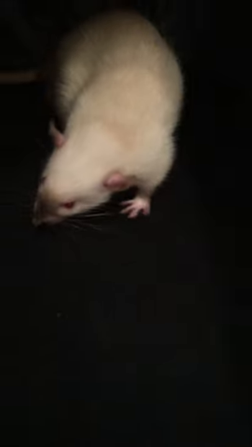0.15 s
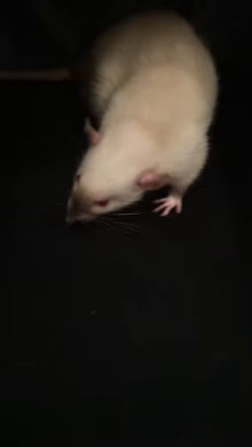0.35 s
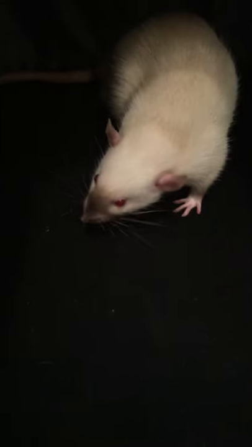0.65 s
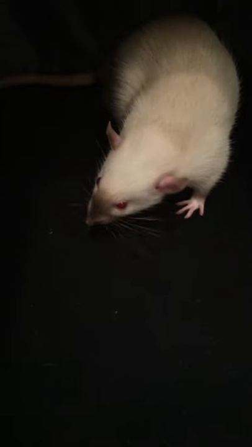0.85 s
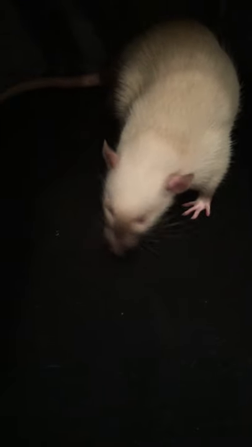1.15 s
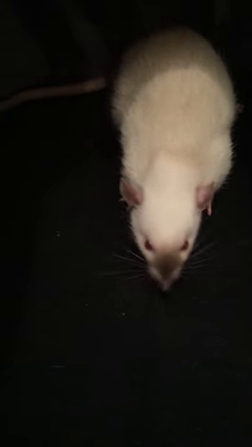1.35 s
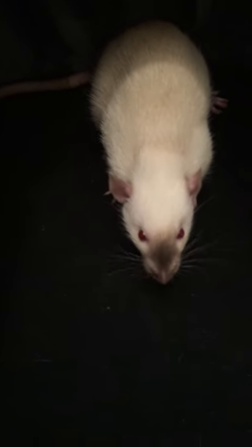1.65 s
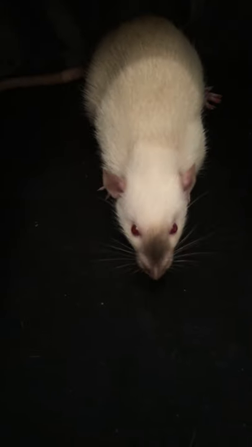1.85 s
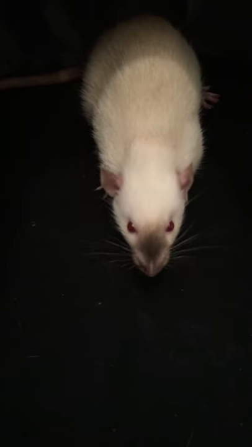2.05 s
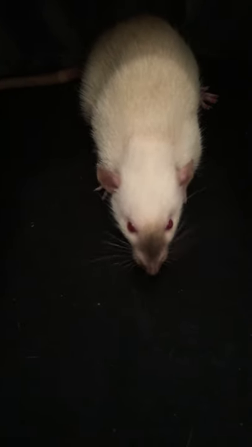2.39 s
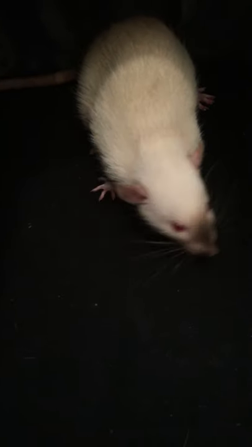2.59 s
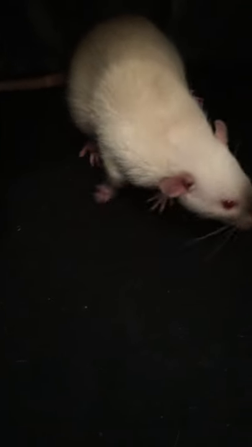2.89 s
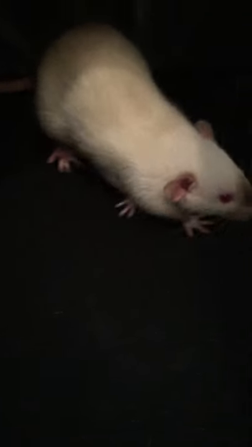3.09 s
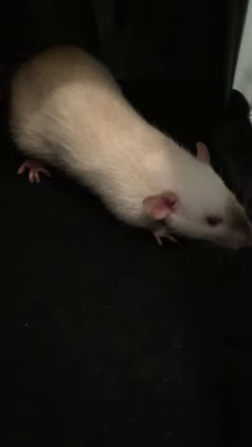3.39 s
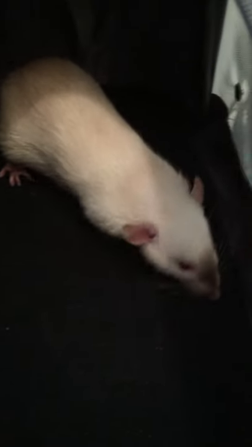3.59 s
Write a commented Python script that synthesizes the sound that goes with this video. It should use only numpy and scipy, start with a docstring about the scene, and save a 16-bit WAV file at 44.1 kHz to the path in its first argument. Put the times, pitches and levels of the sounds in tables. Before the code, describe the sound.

Rat clucking in quick uneven knocking bursts, with soft thumps and faint hum beneath

```python
"""A quiet room: a pet rat chatters close to a microphone while it shifts about on a cloth.
Each cluck is a short, uneven run of throat pulses: a bright knock, a hollow ring under it and a noisy rasp.
Steps are soft low thumps; claws and fur are brief band-limited strokes of grainy noise.
Hum of wavering sines, low rumble and microphone hiss lie beneath."""
import sys
import numpy as np
from scipy import signal
from scipy.fft import rfft, irfft
from scipy.io import wavfile

SR = 44100
rng = np.random.default_rng(int(sys.argv[2]) if len(sys.argv) > 2 else 0)


def to_wav(sig):
    """Store sig (one row per channel, or 1-D mono) as 16-bit WAV at the path in sys.argv[1].

    Samples outside -1..1 are clipped; the rate is SR.
    """
    pcm = np.clip(np.atleast_2d(sig), -1, 1) * 32767
    pcm = np.round(pcm).astype(np.int16)
    wavfile.write(sys.argv[1], SR, pcm.T)  # frames by channels


N = 164493

# Room hum: (frequency [Hz], rms level [dB])
HUM = [(54.5, -59), (61, -68), (86, -62.5), (120, -63.5)]
HUM_WAVER_RAD = 0.3  # rms phase wander
# Noise colours, room rumble and microphone hiss: (frequency [Hz], relative density [dB per Hz])
RUMBLE_SPECTRUM = [(15, -48), (35, -20.5), (52, -3.5), (70, 0.5), (100, 0), (130, -4), (165, -15.5),
                   (205, -17.5), (260, -19), (340, -31.5), (450, -29.5), (620, -39), (780, -44),
                   (1200, -42), (1500, -40), (4000, -69)]
HISS_SPECTRUM = [(100, 8.5), (1000, 4.5), (2200, 2.5), (3400, 1), (4400, 0.5), (4900, -4), (5400, -1.5),
                 (6500, -2), (7600, -5.5), (8700, -4), (9700, -5), (10400, -10), (11200, -6.5),
                 (15500, -10)]
RUMBLE_DB, HISS_DB = -57.5, -74.5  # rms

# Soft footfalls: (time [s], peak level [dB], frequency [Hz], rise [s])
FOOTFALLS = [(0.032, -37.5, 48.4, 0.033), (.115, -45, 132, .014), (0.596, -34, 52.3, 0.022),
             (0.724, -40.5, 61, 0.017), (1.164, -41, 51, 0.024), (1.258, -41.5, 59.7, 0.022),
             (1.747, -41, 100, 0.0098), (2.922, -53, 53.6, 0.0087)]

# Claws and fur on the cloth: (time [s], length [s], level [dB], centre [Hz])
BRUSHES = [(0.049, 0.53, -82, 4500), (0.41, 0.063, -74, 3130), (1.337, .025, -70, 3440),
           (1.42, 0.047, -76.5, 4400), (1.516, 0.064, -74.5, 3660), (1.697, 0.0057, -71, 7060),
           (1.715, .02, -78, 8660), (2.047, .008, -77, 7840), (2.515, 0.0046, -71, 5000),
           (2.76, 0.03, -80, 8500), (2.846, 0.24, -79.5, 3650), (3.133, 0.028, -70, 3260),
           (3.212, 0.066, -72.5, 3550), (3.24, 0.014, -69.5, 8200), (3.308, 0.44, -82.5, 3000),
           (2.801, 0.89, -84.5, 8900), (3.583, 0.073, -79.5, 7970)]
BRUSH_WIDTH_OCTAVES, BRUSH_GRAIN_DB = 0.38, 5  # standard deviations of band and grain level

# Clucks: (time [s], length [s], pulses [count], level [dB], strongest pulse's place [0-1],
#          hollow ring re level [dB], nominal knock pitch [Hz])
CLUCKS = [ (0.0168, .0312, 5, -44.5, 0.69, 1.5, 1390), (0.0746, .0236, 4, -40.5, 0.87, -0.5, 1380),
          (.1652, .027, 4, -48.5, 0.56, 5, 1360), (0.2094, .0066, 2, -49, 0.64, 7.5, 1300),
          (0.2489, .0064, 2, -41, 0.03, -6, 1640), (0.3483, .0088, 2, -40.5, 0.55, -0.5, 1420),
          (0.383, 0.0071, 2, -48, 0.05, 2.5, 1360), (0.419, .029, 4, -43.5, 0.82, 2, 1380),
          (0.4626, .007, 2, -45.5, 0, -2, 1420), (0.51, .0343, 5, -44.5, 0.13, 1.5, 1280),
          (0.5815, .0047, 2, -44, 0.4, 2.5, 1330), (0.6594, .0069, 2, -42.5, 0.3, 1.5, 1520),
          (0.685, .0244, 4, -43, 0.72, 0, 1320), (0.7387, .0073, 2, -48, 0.02, -4, 1280),
          (.817, .0353, 4, -57.5, 0.7, 12, 1280), (.8706, .006, 2, -45.5, 0.45, 3, 1250),
          (0.9073, .0044, 2, -41.5, 0.3, -2.5, 1300), (1.1201, .0343, 5, -47.5, .7, 1.5, 1330),
          (1.191, .0113, 3, -35, 0.88, -5, 1415), (1.2572, .0528, 5, -40, 0.93, -1, 1380),
          (1.3408, .0116, 3, -30.5, 0.81, -10, 1394), (1.4206, .0775, 10, -39.5, 0.73, -6, 1356),
          (1.5217, .0352, 5, -35, 0.36, -7.5, 1410), (1.6074, .008, 2, -42.5, 0.6, -2, 1300),
          (1.642, .0073, 2, -51, 0.9, -7, 1240), (1.6744, .0274, 5, -40.5, 0.36, -2, 1270),
          (1.859, .0334, 5, -36, 0.58, -4, 1250), (1.9895, .0214, 3, -49, 0.3, -5.5, 1320),
          (2.048, .0092, 2, -36, 0.27, -3.5, 1270), (2.0678, .0105, 3, -34, 0.81, -7.5, 1270),
          (2.1312, .0478, 6, -44, 0.47, -4, 1200), (2.2, .0312, 6, -37.5, 0.98, -2.5, 1270),
          (2.31, .02, 3, -53.5, 0.69, 3.5, 1210), (2.5205, .009, 2, -48.5, 0.19, 3, 1320),
          (2.551, .008, 2, -56, 0, 6, 1280), (2.5942, .0183, 4, -41, 0.52, -0.5, 1290),
          (2.6633, .0273, 4, -49.5, 0.3, -3.5, 1280), (2.7503, .0238, 5, -37.5, 0.58, -2, 1294),
          (2.838, .0227, 4, -52, 0.84, 4.5, 1240), (2.8839, .0086, 2, -46.5, 0.37, 3, 1230),
          (2.9377, .0306, 6, -39, .5, 0, 1304), (3.0258, .009, 2, -53.5, 0.43, 6, 1140),
          (3.06, .0213, 2, -51, .3, 0, 1230), (3.113, .0182, 4, -42, 0.8, 0.5, 1096),
          (3.183, .0091, 2, -50.5, 1, -1.5, 1120), (3.2536, .0123, 3, -39.5, 1, 0.5, 1335),
          (3.388, .012, 3, -54, 0.86, 9, 1090), (3.409, .005, 2, -43.5, 0, -3.5, 1510),
          (3.481, .0101, 2, -49, 0.64, 1.5, 1004), (3.5235, .0109, 2, -44.5, 0.45, 1.5, 1010),
          (3.6208, .0309, 2, -47, 0.51, 3.5, 1090)]
SWELL_DB, FADE_DB = 10, 8  # drop before and after the strongest pulse, per whole cluck length
ALTERNATE_DB = 2  # cut of every second pulse, counted from the strongest
SLOWING = 0.094  # pulses spread out towards the end of a cluck
JITTER_S, UNEVEN_DB, PITCH_SPREAD = 0.00046, 1.5, 0.079  # standard deviations; pitch as a ratio
BRIGHTER_PER_DB = 0.01  # stronger pulses in a cluck knock higher: pitch ratio per dB
LEAD_IN_S, LEAD_IN_DB = 0.007, -22  # faint knock before the cluck catches

# Bright knock of one pulse: (frequency [Hz], relative level [dB])
KNOCK_SPECTRUM = [(100, -34), (500, -19), (760, -13), (930, 2.5), (1200, 5), (1520, 6), (1800, -7),
                  (2020, -3.5), (2250, -23.5), (2800, -34.5), (3700, -39), (5000, -58.5), (16000, -70)]
KNOCK_HZ = 1330  # pitch that the spectrum stands for
KNOCK_SHARPNESS = 0.48  # 0 = even click, 1 = hard attack
KNOCK_DB = 1

# Hollow enclosure modes, before the band-pass: (frequency [Hz], level [dB], t60 [s])
RING_MODES = [(266, -16, 0.039), (340.3, -18.5, 0.073), (448.8, -9.5, 0.033), (516.5, -6.5, 0.033),
              (558, -18, 0.0067)]
RING_DB, RING_RISE_S = 7, 0.00041

# Rasp colour: (frequency [Hz], relative level [dB])
RASP_SPECTRUM = [(500, -34), (1600, -0.5), (2000, -3.5), (2250, -12), (2450, 7), (2800, 3), (3200, -1),
                 (3750, -4.5), (4300, -32), (8000, -13.5), (16000, -43)]
RASP_DB, RASP_DECAY_S = -33.5, 0.0084
RASP_GROWTH, RASP_EFFORT_DB = 0.22, -29  # extra rasp dB per pulse dB above this level

# Noise under each cluck: hollow flutter and airy haze in the knock's colour
FLUTTER_DB, HAZE_DB, FLUTTER_SPILL_S = -20, -29, 0.018  # spill widens both at each end

GAP_HZ, GAP_WIDTH_HZ = 746, 147  # dark gap between ring and knock; full width at 1/e
# Nearby walls: (delay [s], level [dB])
WALL_ECHOES = [(.0027, -21), (.0054, -22), (.0072, -19), (0.0113, -20)]
ROOM_DB, ROOM_T60_S = -16, 0.12
EDGE_HZ = 15720  # recorder low-pass


def amp(db):
    """Decibels to gain."""
    return 10 ** (np.asarray(db) / 20)


def unit(x):
    """Scales to rms 1."""
    return x / np.sqrt(np.mean(x ** 2) + 1e-30)


def read(points, hz):
    """Reads a spectrum in dB, interpolated on a log-frequency axis."""
    f, db = np.transpose(points)
    return np.interp(np.log(hz + 1), np.log(f + 1), db)


def add(mix, start_s, sound):
    """Mixes a sound in at a time."""
    part = mix[max(0, round(start_s * SR)):][:len(sound)]
    part += sound[:len(part)]


def noise(points):
    """Steady noise of a given colour, rms 1."""
    gain = amp(read(points, np.fft.rfftfreq(N, 1 / SR)))
    return unit(irfft(rfft(rng.standard_normal(N)) * gain, N))


def background():
    """Hum of sines with slowly wandering phase, plus steady rumble and hiss."""
    t = np.arange(N) / SR
    slow = [(0, 0), (2, 0), (8, -25), (30, -100)]  # wander spectrum (Hz, dB)
    hum = np.zeros(N)
    for hz, db in HUM:
        phase = 2 * np.pi * (hz * t + rng.random()) + HUM_WAVER_RAD * noise(slow)
        hum += amp(db) * np.sqrt(2) * np.sin(phase)
    return hum + amp(RUMBLE_DB) * noise(RUMBLE_SPECTRUM) + amp(HISS_DB) * noise(HISS_SPECTRUM)


def footfalls():
    """Each step sets the surface swinging for a few low cycles."""
    out, t = np.zeros(N), np.arange(SR // 3) / SR
    for start_s, db, hz, rise_s in FOOTFALLS:
        envelope = (t / rise_s * np.exp(1 - t / rise_s)) ** 2
        add(out, start_s, amp(db) * envelope * np.sin(2 * np.pi * hz * t))
    return out


def brushes():
    """Claws and fur on cloth: uneven noise grains in a narrow band, swelling and fading."""
    out, hz = np.zeros(N), np.fft.rfftfreq(SR, 1 / SR)
    for start_s, length_s, db, centre_hz in BRUSHES:
        grains = rng.standard_normal(SR) * amp(BRUSH_GRAIN_DB * rng.standard_normal(SR))
        octaves = np.log2((hz + 1) / centre_hz)
        band = np.exp(-0.5 * (octaves / BRUSH_WIDTH_OCTAVES) ** 2)
        stroke = unit(irfft(rfft(grains) * band, SR))
        shape = np.hanning(round(length_s * SR))
        add(out, start_s, amp(db) * shape * stroke[:len(shape)])
    return out


def knock(size=2048):
    """Bright throat click, peak 1; phase between zero and minimum sets the attack."""
    log_gain = np.log(amp(read(KNOCK_SPECTRUM, abs(np.fft.fftfreq(size, 1 / SR)))))
    phase = -KNOCK_SHARPNESS * signal.hilbert(log_gain).imag
    click = np.fft.ifft(np.exp(log_gain + 1j * phase)).real
    click = np.roll(click, size // 8)  # room for the part ahead of the attack
    return click / abs(click).max()


def hollow_ring(size=2048):
    """Low enclosure modes that each pulse sets ringing: decaying sines with a soft onset."""
    t = np.arange(size) / SR
    ring = np.zeros(size)
    for hz, db, t60_s in RING_MODES:
        ring += amp(db - 60 * t / t60_s) * np.sin(2 * np.pi * hz * t)
    ring *= 1 - np.exp(-t / RING_RISE_S)
    band = signal.butter(2, [160, 660], "bandpass", fs=SR, output="sos")
    return signal.sosfilt(band, ring)


def chatter():
    """Runs of throat pulses that swell, slow a little and stop; each knocks, rings and rasps."""
    out, bright, hollow = np.zeros(N), knock(), hollow_ring()
    rasp_level, under_level = np.zeros(N), np.zeros(N)
    t = np.arange(len(bright)) / SR
    lead_s = np.argmax(abs(signal.hilbert(bright))) / SR  # knock's peak within its buffer
    for start_s, length_s, pulses, level_db, peak, ring_db, pitch_hz in CLUCKS:
        spill = np.hanning(round((length_s + 2 * FLUTTER_SPILL_S) * SR))
        add(under_level, start_s - FLUTTER_SPILL_S, amp(level_db + ring_db) * spill)
        chance = rng.standard_normal((pulses, 4))
        for u, (late, loud, high, low) in zip(np.linspace(0, 1, pulses), chance):
            middle = 4 * u * (1 - u)  # no jitter on first and last pulse
            at_s = start_s + length_s * (u - SLOWING * u * (1 - u)) + JITTER_S * late * middle

            db = level_db + UNEVEN_DB * loud
            db -= SWELL_DB * max(peak - u, 0) + FADE_DB * max(u - peak, 0)
            db -= ALTERNATE_DB * (round((u - peak) * (pulses - 1)) % 2)

            speed = 1 + PITCH_SPREAD * high + BRIGHTER_PER_DB * (db - level_db)
            speed *= pitch_hz / KNOCK_HZ
            click = amp(db + KNOCK_DB) * np.interp((t - lead_s) * speed + lead_s, t, bright)
            add(out, at_s - lead_s, click)
            if u == 0:
                add(out, at_s - lead_s - LEAD_IN_S, amp(LEAD_IN_DB) * click)

            ring = np.interp(t * (1 + PITCH_SPREAD * low), t, hollow)
            add(out, at_s, amp(db + RING_DB + ring_db) * ring)

            rasp_db = db + RASP_GROWTH * (db - RASP_EFFORT_DB)
            add(rasp_level, at_s, amp(rasp_db) * np.exp(-t / RASP_DECAY_S))
    flutter = unit(signal.fftconvolve(rng.standard_normal(N), hollow)[:N])
    under = amp(FLUTTER_DB) * flutter + amp(HAZE_DB) * noise(KNOCK_SPECTRUM)
    return out + under_level * under + amp(RASP_DB) * rasp_level * noise(RASP_SPECTRUM)


def room(x):
    """Discrete echoes from nearby walls and a short, faint decaying-noise tail."""
    t = np.arange(SR // 4) / SR
    tail = rng.standard_normal(len(t)) * amp(-60 * t / ROOM_T60_S) * (t > 0.003)
    out = x + amp(ROOM_DB) * signal.fftconvolve(x, tail / np.linalg.norm(tail))[:N]
    for delay_s, db in WALL_ECHOES:
        add(out, delay_s, amp(db) * x)
    return out


def gap(x):
    """Darkens the band between ring and knock, by 12 dB at its centre."""
    away = ((np.fft.rfftfreq(N, 1 / SR) - GAP_HZ) / (GAP_WIDTH_HZ / 2)) ** 2
    return irfft(rfft(x) * (1 - 0.75 * np.exp(-away)), N)


def scene():
    """The rat in its room, one channel."""
    rat = gap(room(chatter() + brushes()))
    return (rat + footfalls() + background())[None]


def record(dry):
    """The recorder's band limit: a steep linear-phase low-pass."""
    low_pass = signal.firwin(511, EDGE_HZ, window=("kaiser", 9), fs=SR)
    return signal.oaconvolve(dry, low_pass[None], "same")


dry = scene()
out = record(dry)
to_wav(out)
```